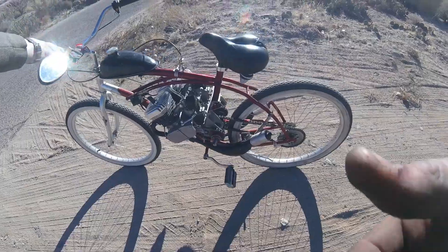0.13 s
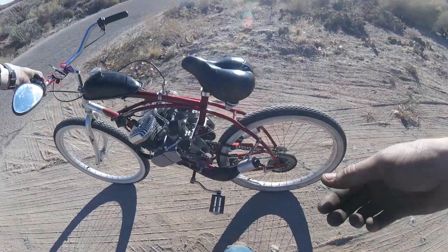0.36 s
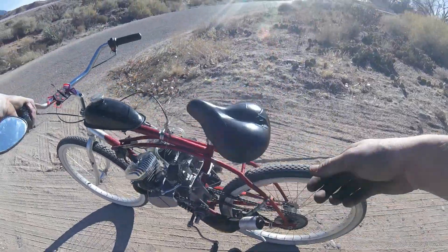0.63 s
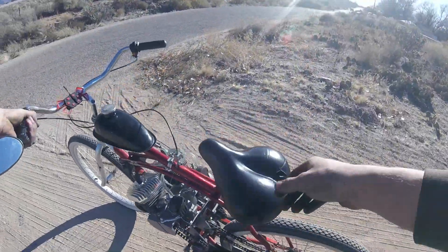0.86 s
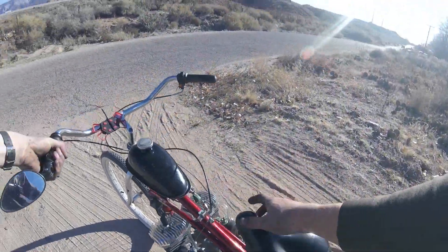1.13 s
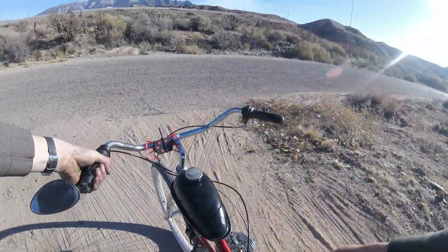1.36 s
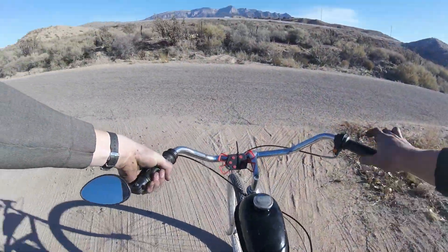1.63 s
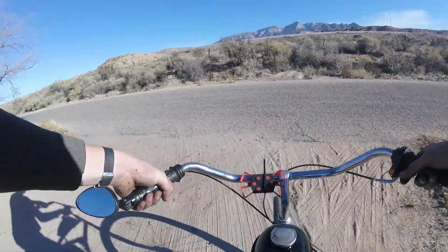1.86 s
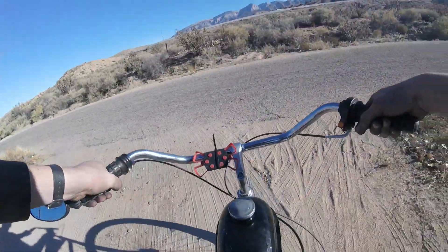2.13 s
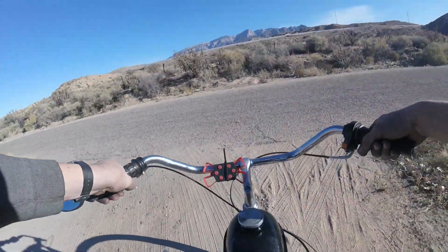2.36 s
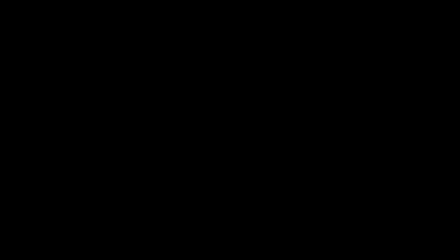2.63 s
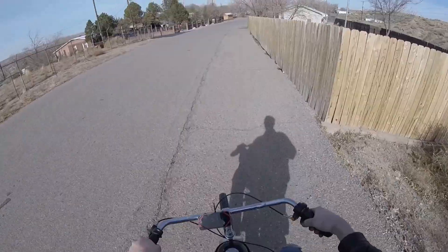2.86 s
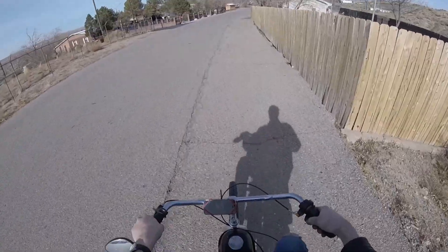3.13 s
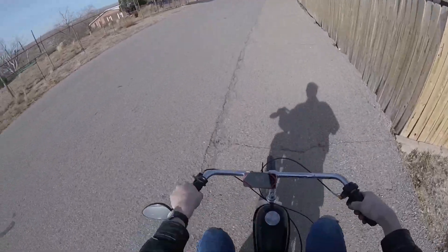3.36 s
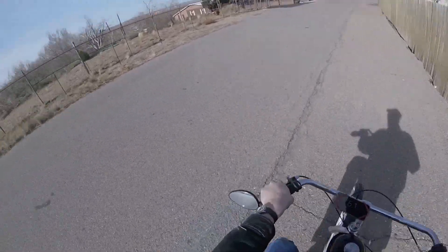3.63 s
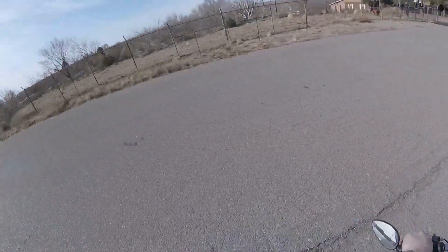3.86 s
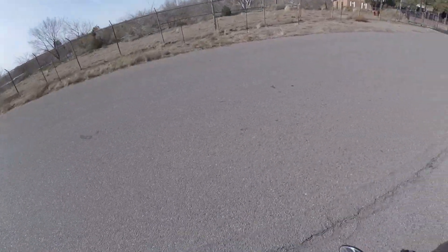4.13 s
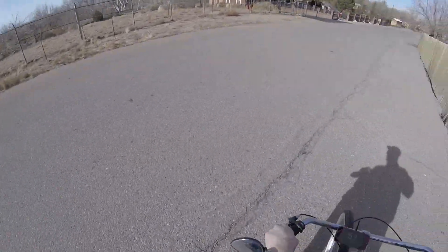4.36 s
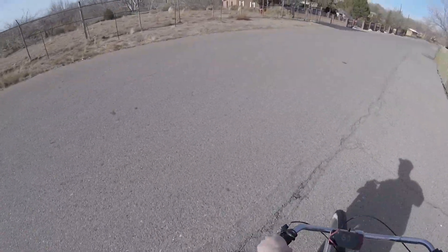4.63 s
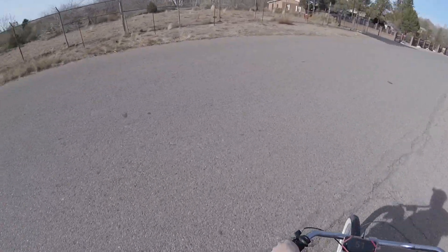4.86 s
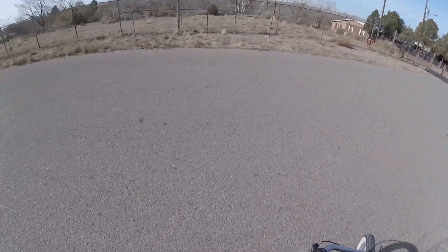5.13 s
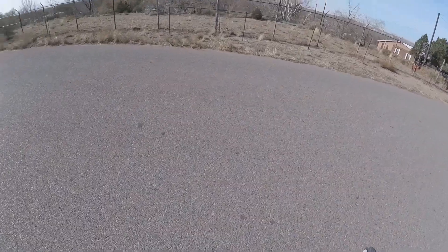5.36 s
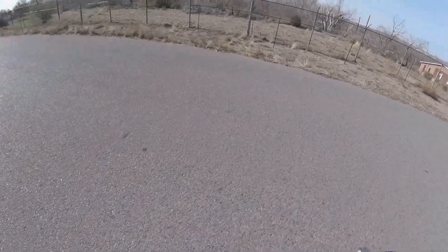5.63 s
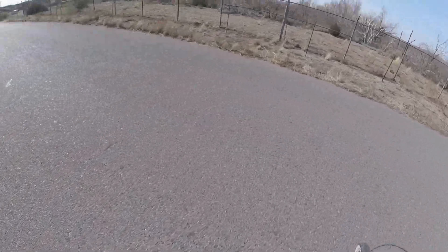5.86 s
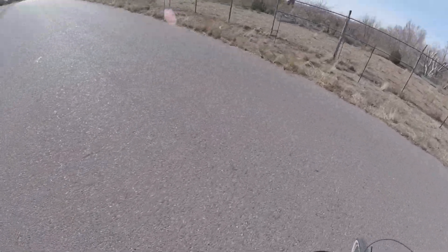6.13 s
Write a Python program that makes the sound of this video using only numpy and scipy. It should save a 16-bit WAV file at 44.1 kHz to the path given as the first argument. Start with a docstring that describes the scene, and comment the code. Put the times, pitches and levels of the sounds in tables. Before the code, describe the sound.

Outdoors, close to the microphone, two tiny two-stroke engines on a bicycle idle with hard, irregular pops and ringing metal chatter in light wind. The idle evens out, then fades to silence. It fades back in riding: a faster, denser buzz with heavy wind rumble, scattered knocks, a sag in engine speed, a double jolt over a bump, then a throaty pull away.

```python
"""Uneven popping comes first: two small two-stroke engines idle on a bicycle, in a light wind.
After a fade through silence the bicycle rolls along a road in strong wind, slows and pulls away.
Firing pulses excite pipe resonances; noise beating with the crank excites the ringing metal;
hard firings are damped oscillations, the two jolts are pulses with rings, and wind is coloured noise.
"""
import sys
import numpy as np
from scipy import signal
from scipy.fft import rfft, irfft
from scipy.io import wavfile
from scipy.ndimage import uniform_filter1d

SR = 44100
rng = np.random.default_rng(int(sys.argv[2]) if len(sys.argv) > 2 else 0)


def boost_factor(decibels):
    """Convert a level in decibels to a linear amplitude factor."""
    exponent = np.asarray(decibels, float) / 20
    return 10 ** exponent


def dump(signal):
    """Clip the signal to [-1, 1] and save it as 16-bit WAV at the path in sys.argv[1]."""
    limited = np.clip(np.atleast_2d(signal).T, -1, 1)
    pcm = np.round(limited * 32767).astype(np.int16)
    wavfile.write(sys.argv[1], SR, pcm)


N = 275625
TIME = np.arange(N) / SR
RIDING = TIME > 2.71  # standing before, riding after

# Engine levels: t/s, fin rattle level/dB, crankcase rattle level/dB, front exhaust level/dB,
# rear exhaust level/dB, head turned away/0-1
ENGINE = [(0, -27.5, -40, -45.5, -45, 0.01), (.3, -29.5, -43.5, -48.5, -39.5, 0),
          (.6, -33, -42, -48, -60, 0.2), (1.5, -34, -35.5, -43.5, -35, 0.86),
          (1.85, -31, -34, -32, -35, 0.52), (2.3, -30, -31, -36, -35, 0.74),
          (2.7, -30.5, -30, -32, -27.5, 0.5), (2.72, -25.5, -27.5, -31, -35, 0.6),
          (3.25, -27, -36, -31.5, -49.5, 0.12), (3.68, -24, -32, -33.5, -32.5, 0.05),
          (3.9, -31.5, -30, -32, -40.5, 0.67), (4.2, -34, -35.5, -38.5, -59.5, 0.44),
          (4.7, -31, -29, -36, -34, 0.75), (5.1, -34, -30.5, -33.5, -33.5, .8),
          (5.42, -35.5, -33.5, -32.5, -29.5, 0.97), (5.58, -31, -30.5, -43, -26.5, 1),
          (5.82, -31.5, -33, -46, -26, 0.73), (6.05, -32.5, -36.5, -34.5, -27, 1),
          (6.25, -31, -32, -27, -27, 1)]
# Firing rate of the front engine, which when riding runs free and sinks back: t/s, f/Hz
FRONT_RATE = [(0, 55.3), (1.6, 55.3), (1.9, 57.2), (2.7, 55.5), (2.72, 66), (3.1, 66), (3.4, 67.6),
              (3.55, 67.6), (3.65, 69.2), (3.85, 69.5), (4.45, 68.5), (4.8, 67.3), (4.94, 65), (5.15, 68.5),
              (5.4, 67), (6.25, 62)]
# Firing rate of the rear engine, which when riding picks up the load: t/s, f/Hz
REAR_RATE = [(0, 33), (1.6, 35), (2.7, 34), (2.72, 51), (4.6, 50), (5, 45), (5.35, 46.4), (5.46, 48.5),
             (5.55, 55.2), (5.6, 57.6), (5.85, 58.8), (6, 57), (6.1, 54.8), (6.16, 56), (6.25, 61)]
# Irregularity of firing: t/s, stumble/0 smooth - 1 lumpy idle
STUMBLE = [(0, 1), (1.5, 1), (1.75, .12), (2.7, .12), (2.72, 0), (3.7, 0), (3.85, .2), (5.3, .25),
           (5.55, .08), (6.25, .08)]
# Strong single firings: t/s, push level/dB, crack and spit level before their weights/dB,
# pipe ring level/dB
POPS = [(0.021, -7, -22.5, -25), (0.104, -7.5, -21, -30), (0.133, -13, -50.5, -36),
        (0.194, -7.5, -25.5, -60), (0.223, -12, -41, -47), (0.284, -12, -23, -25), (0.3022, -7, -19, -22),
        (0.41, -9.5, -18, -21), (0.484, -10.5, -19, -21), (0.546, -11, -25, -28),
        (0.574, -11.5, -18.5, -21), (0.662, -10, -20, -22), (0.698, -9, -30, -30), (0.788, -11, -16.5, -20),
        (0.88, -10, -25, -21), (0.97, -11, -19, -21), (0.989, -10, -29, -43), (1.089, -9, -23, -34),
        (1.097, -10, -17.5, -20), (1.207, -9.5, -16, -20), (1.238, -10, -35, -42), (1.3, -10.5, -25, -36),
        (1.317, -12, -24, -40), (1.383, -9, -31.5, -33), (1.422, -13, -25, -40), (1.533, -10, -19.5, -40),
        (1.643, -6, -25.5, -45), (1.75, -11, -24.5, -28), (1.79, -24, -38.5, -21), (1.825, -17, -45, -26),
        (1.835, -17, -46.5, -25), (1.871, -13.5, -44, -32), (1.914, -31, -43.5, -22), (1.96, -12, -35, -18),
        (2.022, -11.5, -28.5, -27), (2.048, -21, -38, -24), (2.136, -12, -42, -26), (2.171, -7, -28, -33),
        (2.213, -19, -42, -34), (2.262, -11.5, -28.5, -21), (2.335, -12.5, -41, -31), (3.71, -10, -37, -31),
        (3.813, -18, -30.5, -21), (3.893, -9.5, -23, -16), (3.949, -11, -22.5, -15.5),
        (4.029, -10, -29.5, -25), (4.108, -8.5, -26.5, -27), (4.137, -10, -51.5, -35),
        (4.167, -16, -36, -21), (4.226, -13, -25, -14), (4.276, -12, -43, -28), (4.297, -19, -40, -18),
        (4.403, -12, -30.5, -21), (4.519, -16, -35, -21), (4.577, -9, -30.5, -22), (4.652, -25, -33, -15),
        (4.773, -11, -40, -18), (4.908, -30, -25, -15), (4.969, -18, -33, -22), (5.021, -15, -40, -21),
        (5.078, -30, -47, -28), (5.139, -10.5, -39, -28), (5.795, -13, -42, -28), (5.863, -5, -37.5, -30)]
# Resonances of the metal: mean f/Hz, width/Hz
METAL_MODES = [(1240, 120), (1500, 140), (1682, 55), (1945, 75), (2280, 140), (2983, 85), (3230, 80),
               (3520, 70), (3900, 70), (4120, 40), (4555, 60), (4840, 80), (5055, 80), (5295, 55),
               (5970, 65), (6187, 52), (6445, 90), (8820, 70), (9640, 150)]
# How each metal mode is heard, relative: level facing it/dB, level turned away/dB,
# share beating with the crank/0-1
MODE_HEARD = [(-13.5, -6.5, 0.78), (-7, -12, 0.75), (7, -4, 0.5), (8.5, -6.5, 0.33), (-38.5, -6.5, 1),
              (-7, 6, 0.7), (-24.5, -5, 0.4), (-7.5, 0, 0.85), (-13.5, 0.5, 0.25), (-3, 0, 0.6),
              (3.5, 4, 0.2), (3, 1, 0), (1, -3, 0.2), (4, -4.5, 0), (-5, -22.5, 0.6), (-23.5, -27.5, 0.6),
              (0, -0.5, 0.31), (-16.5, -9, 0.6), (-23, -21, 0.5)]
# Air and gear noise between the modes, riding: f/Hz, relative spectral level/dB per Hz
HISS_RIDING = [(290, -25), (500, -8), (827, -7.5), (1000, -15.5), (1350, -6.5), (1940, 2.5), (2230, -9.5),
               (2930, -5), (3740, -14.5), (4960, -4.5), (5720, -10), (6590, -9), (8310, -18.5),
               (8980, -17.5), (10900, -65), (14200, -75), (22000, -120)]
# The same without road and chain: f/Hz, relative spectral level/dB per Hz
HISS_STANDING = [(290, -9.5), (500, -19), (827, -20), (1100, -11.5), (1700, -1), (2330, -10.5),
                 (2930, -4.5), (3740, -13), (4960, -10), (6590, -11.5), (8310, -16.5), (9600, -25),
                 (10900, -54), (14200, -66), (22000, -120)]
# Exhaust pipe resonances: f/Hz, width/Hz, then relative level/dB: front standing, front riding, rear
PIPE_MODES = [(227, 89, 5.5, 5, -3.5), (321, 88, 9.5, -15, 0), (405, 73, -12.5, -16, -3.5),
              (501.5, 79, -8.5, 4, 2.5), (660, 134, 1, -4, -7), (821, 89, -20, 4.5, -10.5),
              (885, 55, -23, -22.5, -5), (968, 190, 0.5, -6, -18), (1420, 250, -4.5, -24, -23)]
# Intake howl under load: start t/s, end t/s, swell t/s, lowest f/Hz, highest f/Hz
HOWL = (5.53, 6.03, .03, 1130, 1290)
# Two jolts over a bump: t/s, thump level/dB, ring level/dB, ring pitch factor, ring length factor
JOLTS = [(5.329, -8, 1.5, 1, 1), (5.357, -9, -1, .8, .4)]
# Modes of a loose part before the jolt's factors: f/Hz, level relative to the jolt's ring/dB, t60/s
LOOSE_PART = [(1227, -21, .14), (1330, -25, .06), (1420, -19, .05)]
# Mean wind, standing and then riding: t/s, rumble level/dB, flutter level/dB, buffet level/dB
WIND = [(0, -38, -29.5, -41), (.6, -33, -30, -42), (.72, -32, -23, -35), (.83, -37, -29.5, -30.5),
        (.95, -34, -29, -43.5), (1.45, -39, -34.5, -39.5), (2.7, -42, -31, -38), (2.72, -37, -21, -23),
        (3.02, -24.5, -25, -26.5), (3.2, -32, -22, -20.5), (3.3, -24.5, -34, -23.5),
        (3.5, -26.5, -27.5, -25.5), (3.56, -33, -25.5, -27), (3.72, -25.5, -29, -37),
        (4.2, -18.5, -26, -32.5), (4.5, -23, -27, -31.5), (5, -21.5, -28.5, -27.5),
        (5.36, -21.5, -23, -29.5), (5.47, -24.5, -27, -29.5), (5.65, -20, -20.5, -31),
        (5.9, -24.5, -23, -27.5), (6.03, -21, -24, -26), (6.12, -20.5, -24, -30), (6.25, -20, -31, -25.5)]
# Single gusts that thump the microphone: middle t/s, length t/s, rise above the mean wind level/dB
GUSTS = [(0.339, 0.098, 10.5), (0.783, 0.09, 9.5), (0.89, 0.012, 20), (1.1, 0.029, 0), (1.22, 0.024, 4),
         (1.558, 0.035, 8), (1.782, 0.073, 4), (2.057, 0.047, 5), (2.18, 0.042, -1), (2.312, 0.05, 6),
         (3.257, 0.04, 5), (3.345, 0.13, 6), (3.485, 0.048, 8.5), (3.773, 0.18, 7), (3.851, 0.013, 11.5),
         (3.959, 0.025, 10.5), (4.04, 0.056, 5.5), (4.157, 0.023, 11.5), (4.245, 0.053, 6), (4.3, 0.024, 9),
         (4.473, 0.023, 14.5), (4.615, 0.0067, 18.5), (4.684, 0.011, 8), (4.745, 0.077, 7.5),
         (4.95, 0.1, 4.5), (5.06, 0.069, 4.5), (5.226, 0.081, 7.5), (5.317, 0.068, 6.5), (5.37, 0.024, 3.5),
         (5.606, 0.013, 8), (5.73, 0.15, 5.5), (5.846, 0.085, 9), (5.977, 0.12, 9), (6.036, 0.019, 1.5)]
# Spectrum of the low wind: f/Hz, relative spectral level/dB per Hz
RUMBLE_SPECTRUM = [(15, -11), (40, 0.5), (70, -3), (130, -9.5), (200, -32), (300, -78)]
# Spectrum of the upper wind: f/Hz, relative spectral level/dB per Hz
FLUTTER_SPECTRUM = [(70, -13.5), (130, -6.5), (220, -8.5), (320, -14), (600, -22), (1200, -34), (2500, -67)]
# Fade through silence: t/s, level/dB
FADE = [(2.4, 1.5), (2.7, -60), (2.72, -58), (3.05, 0)]


def evened(x):
    """Normalisation of power: scales to rms 1."""
    return x / np.sqrt(np.mean(x ** 2) + 1e-20)


def curves(rows):
    """Linear interpolation: every column of a table over time."""
    t, *columns = np.transpose(rows)
    return [np.interp(TIME, t, column) for column in columns]


def coloured(spectrum):
    """Spectral shaping: white noise weighted by the given spectrum, rms 1."""
    f, db = np.transpose(spectrum)
    hz = np.fft.rfftfreq(N, 1 / SR)
    weight_db = np.interp(np.log(hz + 1), np.log(f + 1), db)
    return evened(irfft(rfft(rng.standard_normal(N)) * boost_factor(weight_db), N))


def wander(hz):
    """Slow random fluctuation: chance values drawn at the rate hz and joined by lines, rms about 1."""
    points = rng.standard_normal(800)
    return np.interp(TIME * hz, np.arange(800), points) * np.sqrt(1.5)


def resonate(x, hz, width):
    """Resonance of a damped mode, gain about 1 at its peak; hz may move with time."""
    r = np.exp(-np.pi * width / SR)
    if np.ndim(hz) == 0:
        pole = r * np.exp(2j * np.pi * hz / SR)
        return 2 * signal.lfilter([1 - r], [1, -pole], x).real
    # A moving resonance: shift hz down to zero, smooth, shift back
    turn = np.exp(2j * np.pi * np.cumsum(hz) / SR)
    return 2 * (turn * signal.lfilter([1 - r], [1, -r], x / turn)).real


def crank(hz, waver):
    """Phase as the integral of frequency: crank turns since the start; the speed hunts a little."""
    return np.cumsum(hz * (1 + waver * wander(30))) / SR


def beat(turns, fall, spread_db):
    """Periodic relaxation: one decaying burst per turn, each of its own strength; fall in turns."""
    strength = boost_factor(spread_db * rng.standard_normal(600))
    return evened(strength[turns.astype(int)] * np.exp(-(turns % 1) / fall))


def pops():
    """Damped oscillation: a hard firing pushes and swings back, cracks, rings, spits gas and echoes."""
    length = 2000
    t = np.arange(length) / SR
    out, knocks = np.zeros(N + length), np.zeros(N + length)
    rise = 1 - np.exp(-t / .0003)
    for s, push_db, crack_db, ring_db in POPS:
        a, b = rng.uniform(-1, 1, 2)  # chance detuning
        push = np.cos(2 * np.pi * 330 * (1 + 0.15 * a) * t - .6) * np.exp(-t / 0.0017)
        ring = np.sin(2 * np.pi * 835 * (1 + 0.02 * b) * t) * np.exp(-t / 0.003)
        crack = np.sin(2 * np.pi * 3060 * (1 + 0.03 * b) * t) * np.exp(-t / 0.001)
        spit_fall = 0.55 * np.exp(-t / 0.00087) + 0.4 * np.exp(-t / 0.008)
        spit = np.diff(rng.standard_normal(length + 1)) * spit_fall
        sharp = boost_factor(crack_db) * (2.44 * crack + .45 * spit)
        at = round(s * SR)
        out[at:at + length] += rise * (boost_factor(push_db) * push + boost_factor(ring_db) * ring + sharp)
        # The blow also shakes the metal, which starts to chatter as the pressure builds
        knocks[at:at + length] += boost_factor(crack_db + 20.5) * np.exp(-t / 0.0045)
        before = knocks[max(at - 400, 0):at][::-1]  # a view running back in time
        before += boost_factor(crack_db + 18) * np.exp(-t[:len(before)] / .003)
    lag = round(0.00277 * SR)  # ground echo
    out[lag:] += 0.22 * out[:-lag].copy()
    return out[:N], knocks[:N]


def ticks():
    """Random impulses with exponential decay: loose parts tick."""
    per_s, decay_s, share = 150, 0.0031, 0.23
    hits = (rng.random(N) * SR < per_s) * rng.exponential(1, N)
    return share * evened(signal.lfilter([1], [1, -np.exp(-1 / (decay_s * SR))], hits))


def rattle(front, rear, knocks):
    """Forced modal vibration: piston slap and gear lash shake fins and case; each mode varies by itself."""
    fins_db, case_db, front_db, rear_db, turned = curves(ENGINE)
    turned = np.clip(turned, 0, 1)
    lead = 1 / (1 + boost_factor(2 * (rear_db - front_db)))  # the harder working engine sets the beat
    split_hz, drift, strike = 2500, .002, .85  # drift: share of pitch; strike: one clean blow per turn
    case, fins = np.zeros(N), np.zeros(N)
    grit = ticks()
    for (hz, width), (near_db, away_db, share) in zip(METAL_MODES, MODE_HEARD):
        share, late = np.clip(share, 0, 1), rng.random()
        front_slap = beat(front + late, fall=0.12, spread_db=2.2)
        rear_slap = beat(rear + late, fall=0.22, spread_db=2.2)
        slap = lead * front_slap + (1 - lead) * rear_slap
        envelope = share * slap + 1 - share + grit + 1.5 * knocks * (hz > split_hz)
        drive = rng.standard_normal(N) * envelope
        drive += strike * share * evened(np.maximum(np.diff(slap, prepend=0), 0))
        ring = resonate(drive, hz * (1 + drift * wander(4)), width)
        ring = evened(ring) * np.sqrt(width / 60)
        side = case if hz < split_hz else fins
        side += ring * boost_factor(near_db + (away_db - near_db) * turned + 0.87 * wander(25))
    metal = boost_factor(case_db) * evened(case) + boost_factor(fins_db) * evened(fins)
    hiss_db = .3 * case_db + 0.7 * fins_db - 1.5
    return boost_factor(0.28 * wander(14)) * (metal + boost_factor(hiss_db) * hiss(front, rear, lead, grit, knocks))


def hiss(front, rear, lead, grit, knocks):
    """Amplitude modulation: air and gear noise breathes with the crank, the ticks and the hard firings."""
    breath = lead * beat(front, fall=.3, spread_db=3) + (1 - lead) * beat(rear, fall=.3, spread_db=3)
    noise = np.where(RIDING, coloured(HISS_RIDING), coloured(HISS_STANDING))
    return noise * (0.72 + 0.36 * breath + 1.3 * grit + 3.0 * knocks)


def exhaust_drive(turns, limp_db, wave_return, roar):
    """Pulsed excitation: a pressure pulse and a puff of gas per firing, with the pipe's returning wave."""
    stumble = curves(STUMBLE)[0]
    spread_db = .8 + (4 - .8) * stumble  # firing strength, smooth to lumpy
    gas = .12 + (.5 - .12) * stumble  # gas noise share, smooth to lumpy
    count = turns.astype(int)
    strength_db = spread_db * rng.standard_normal(600)[count] + limp_db * (-1.) ** count
    returning = np.diff((turns + .55).astype(int), prepend=0)  # about half a turn after each firing
    firings = np.diff(count, prepend=0) + wave_return * returning
    puffs = rng.standard_normal(N) * beat(turns, fall=1.0, spread_db=1.5)
    return evened(firings * boost_factor(strength_db)) + (gas + roar) * puffs


def pipe(drive, levels_db):
    """Superposition of modes: the drive rings each pipe resonance, with alternating sign."""
    out = np.zeros(N)
    for k, ((hz, width, *_), level_db) in enumerate(zip(PIPE_MODES, levels_db)):
        out += (-1) ** k * boost_factor(level_db) * resonate(resonate(drive, hz, width), hz, 3 * width)
    return evened(out)


def exhaust(front, rear):
    """Source and resonator: firing pulses ring both pipes; every other rear firing is weaker."""
    front_db, rear_db = curves(ENGINE)[2:4]
    front_modes_db = [np.where(RIDING, moving, standing) for _, _, standing, moving, _ in PIPE_MODES]
    rear_modes_db = [row[4] for row in PIPE_MODES]
    front_drive = exhaust_drive(front, limp_db=0, wave_return=.2, roar=0)
    rear_drive = exhaust_drive(rear, limp_db=1, wave_return=.28, roar=.14)
    front_pipe = boost_factor(front_db) * pipe(front_drive, front_modes_db)
    rear_pipe = boost_factor(rear_db) * pipe(rear_drive, rear_modes_db)
    return front_pipe + rear_pipe + howl(rear_drive)


def howl(drive):
    """Moving resonance: the intake rings while the throttle is open; its pitch arches."""
    start, end, swell, low_hz, high_hz = HOWL
    on = np.clip(np.minimum(TIME - start, end - TIME) / swell, 0, 1)
    progress = np.clip((TIME - start) / (end - start), 0, 1)
    hz = low_hz + (high_hz - low_hz) * np.sqrt(np.abs(np.sin(np.pi * progress)))
    return boost_factor(-40.5) * on * evened(resonate(resonate(drive, hz, 190), hz, 170))


def jolts():
    """Impact and free decay: each jolt is a dull thump, and a loose part rings out after it."""
    out = np.zeros(N)
    for s, thump_db, ring_db, pitch, length in JOLTS:
        u = (TIME - s) / 0.0012  # thump width in s
        t = np.maximum(TIME - s, 0)
        out -= boost_factor(thump_db) * (1 - u ** 2 / 2) * np.exp(-u ** 2 / 2)
        for hz, db, t60 in LOOSE_PART:
            decay = boost_factor(ring_db + db - 60 * t / (t60 * length))
            out += (1 - np.exp(-t / 0.0052)) * decay * np.sin(2 * np.pi * hz * pitch * t)
    return out


def wind():
    """Turbulence: eddies on the microphone rumble with the gusts, buffet nearly regularly and flutter."""
    rumble_db, flutter_db, buffet_db = curves(WIND)
    gust_db = sum(rise_db * np.exp(-((TIME - s) / (length / 2)) ** 2) for s, length, rise_db in GUSTS)
    lumps_db = wander(30)
    # Dividing by the swell evens out the noise's chance swells, so that the gust table sets the loudness
    eddies = coloured(RUMBLE_SPECTRUM)
    swell = np.sqrt(uniform_filter1d(eddies ** 2, size=2600))
    rumble = evened(eddies / swell ** .9 * boost_factor(0.71 * lumps_db))
    flutter = evened(coloured(FLUTTER_SPECTRUM) * boost_factor(1.6 * lumps_db + 0.9 * wander(70)))
    # Eddies shed at a nearly regular rate, evened out likewise
    shed = resonate(rng.standard_normal(N), 68.4 * (1 + 0.046 * wander(9.6)), width=18.6)
    buffet = evened(shed / np.sqrt(uniform_filter1d(shed ** 2, size=2600)) ** 0.87)
    out = boost_factor(rumble_db + gust_db) * rumble + boost_factor(buffet_db + gust_db) * buffet
    return out + boost_factor(flutter_db + 0.35 * gust_db) * flutter  # the flutter follows gusts in part


def scene():
    """Superposition: hard firings, metal, exhausts, jolts and wind add up in one channel."""
    front = crank(curves(FRONT_RATE)[0], waver=.005)
    rear = crank(curves(REAR_RATE)[0], waver=.007)
    bangs, knocks = pops()
    return (bangs + rattle(front, rear, knocks) + exhaust(front, rear) + jolts() + wind())[None]


def low_pass(x):
    """Removes everything above the highest recorded frequency."""
    return signal.sosfilt(signal.butter(12, 14300, fs=SR, output="sos"), x)


def record(dry):
    """Low-pass filtering: a gentle one dulls the top, a steep one ends it near 11 kHz; then the fade."""
    dulled = signal.sosfilt(signal.butter(N=2, Wn=9000, fs=SR, output="sos"), dry)
    ended = signal.sosfilt(signal.butter(N=8, Wn=11100, fs=SR, output="sos"), dulled)
    faded = ended * boost_factor(curves(FADE)[0])  # out and in between the two places
    return low_pass(faded)


dry = scene()
out = record(dry)
dump(out)
```